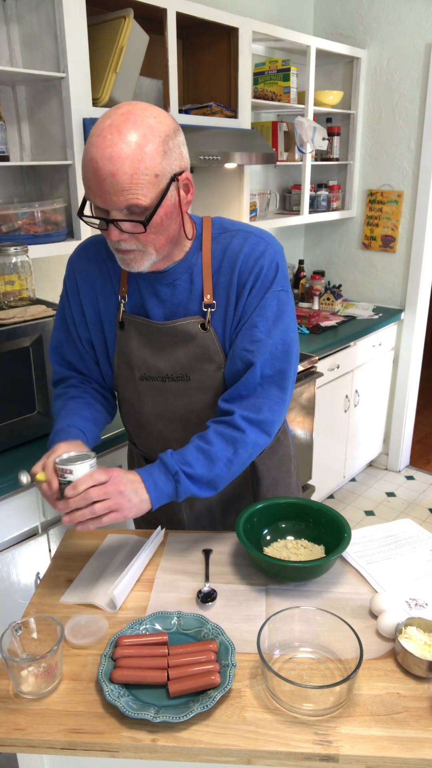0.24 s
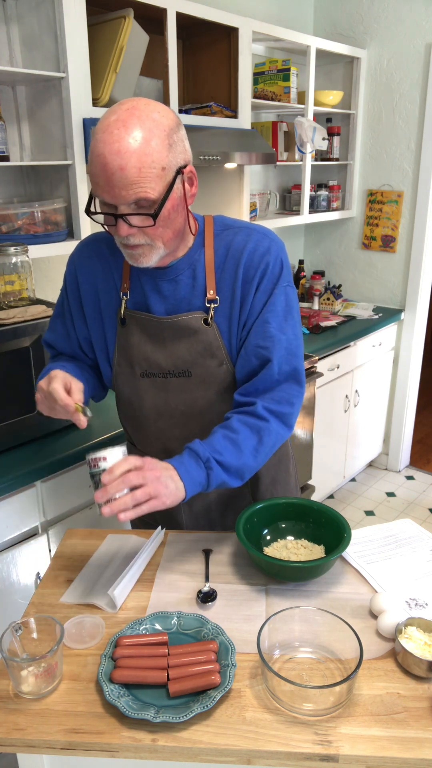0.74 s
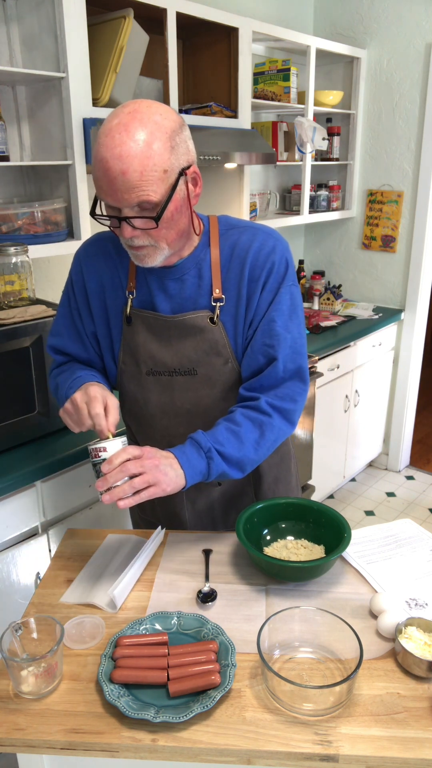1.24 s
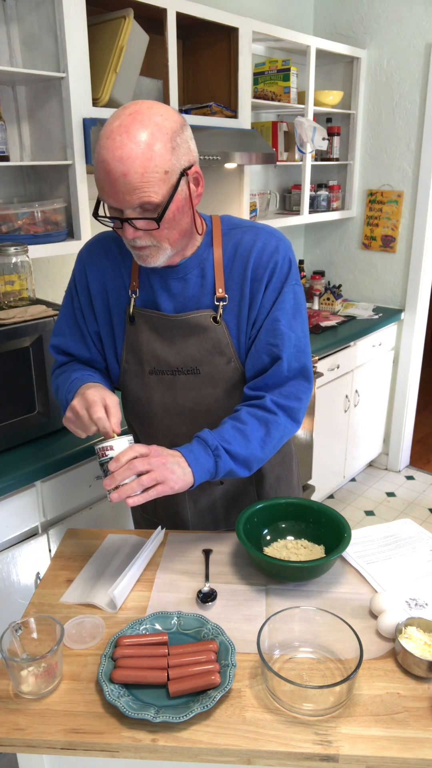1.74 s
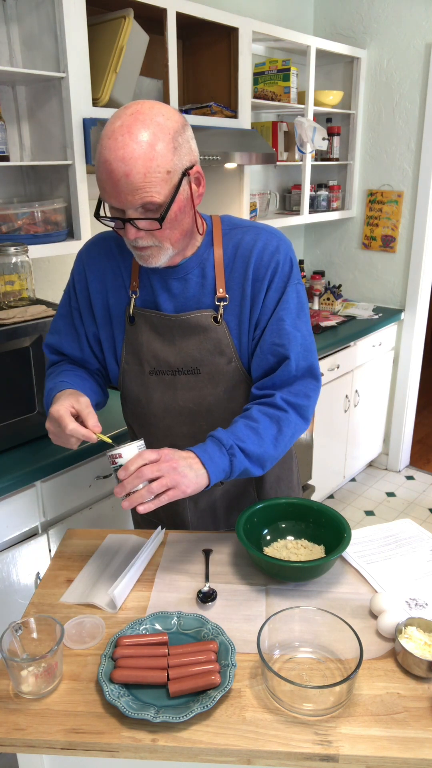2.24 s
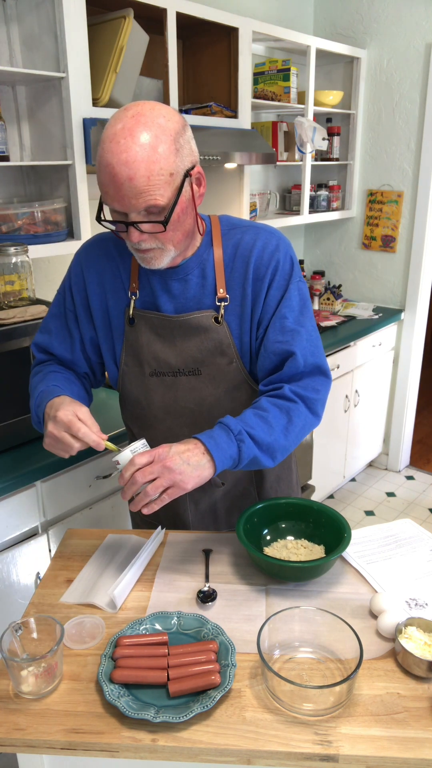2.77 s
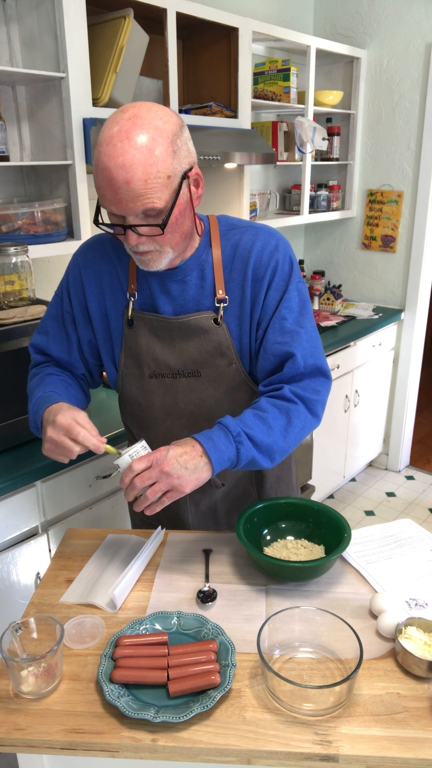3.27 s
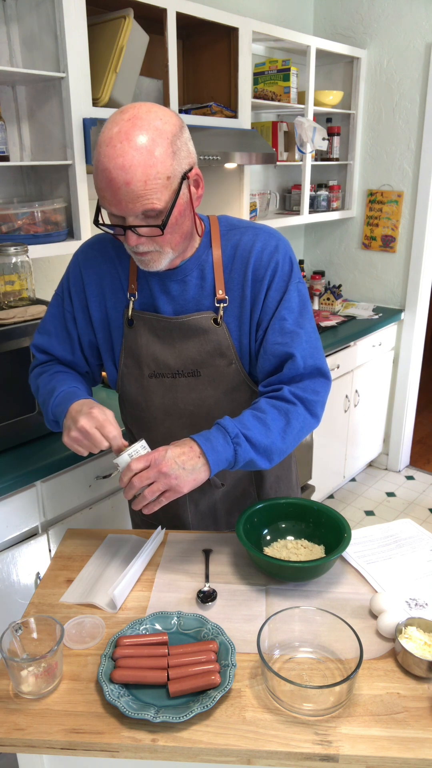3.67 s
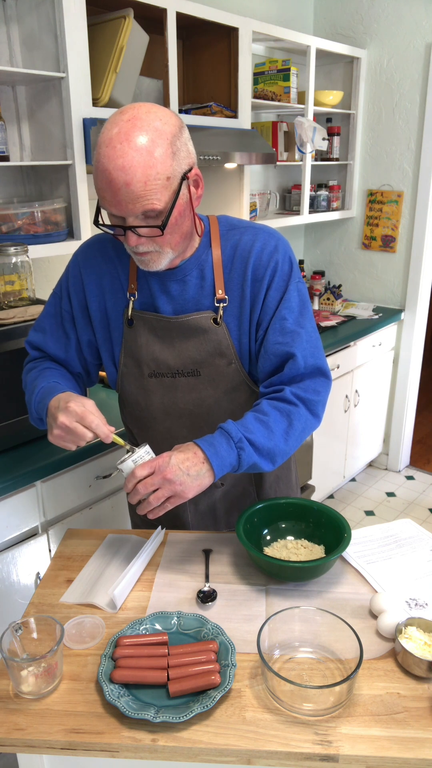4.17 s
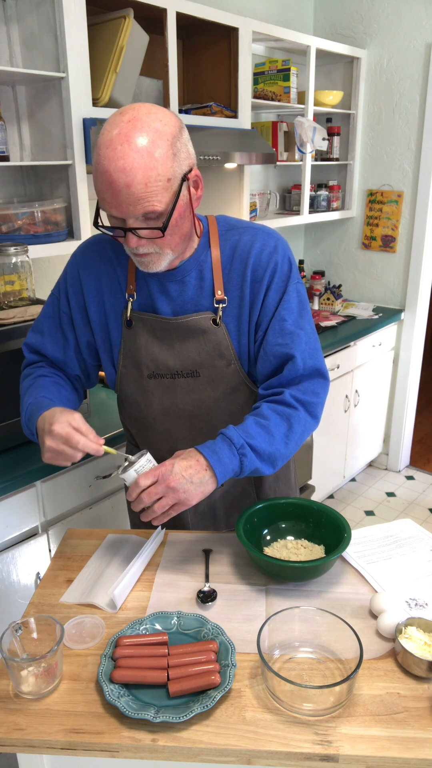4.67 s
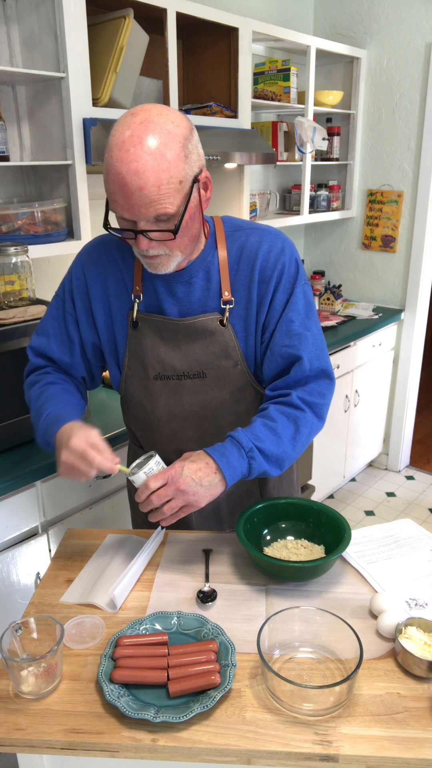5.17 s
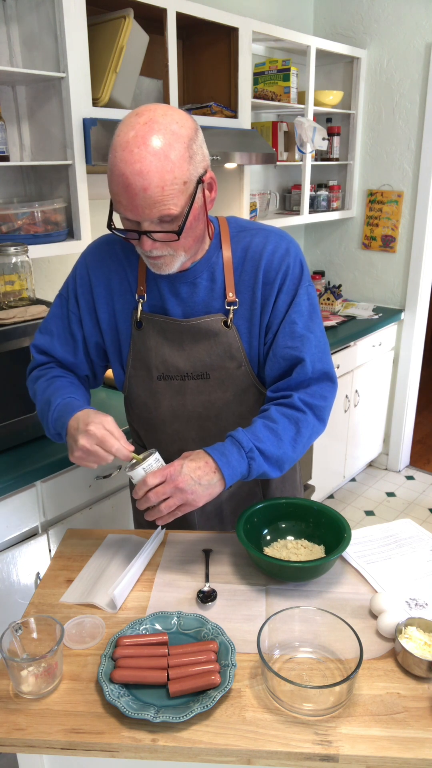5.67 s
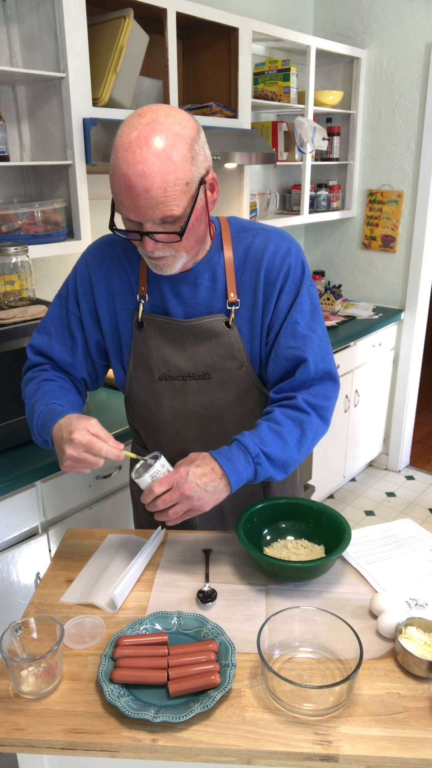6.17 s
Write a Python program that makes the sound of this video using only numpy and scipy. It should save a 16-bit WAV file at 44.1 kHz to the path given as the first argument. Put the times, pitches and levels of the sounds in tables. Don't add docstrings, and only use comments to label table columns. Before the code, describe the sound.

Loose metal measuring spoons rattle in the hand, then one clicks sharply into a metal can, digs through powder, scrapes and taps the rim.

```python
import sys
import numpy as np
from scipy import signal
from scipy.fft import rfft, irfft
from scipy.io import wavfile

SR = 44100
rng = np.random.default_rng(int(sys.argv[2]) if len(sys.argv) > 2 else 0)


def decibels_to_gain(level_db):
    exponent = np.asarray(level_db, float) / 20
    return 10 ** exponent


def persist_wave(psi):
    counts = np.round(np.clip(psi, -1, 1) * 32767).astype(np.int16)
    wavfile.write(sys.argv[1], SR, np.atleast_2d(counts).T)


N = 283122

# frequency in Hz, width in Hz, level in dB.
SPOON_LOW = [(583, 120, -4.5), (1060, 150, 4), (1243, 71, 6.5), (1560, 130, -2)]
SPOON_BOWL = [(2160, 200, -14.5), (2625, 78, -3.5), (2840, 120, -1.5), (2760, 260, -6), (3150, 180, -1.5),
              (4300, 320, 1), (4560, 260, -18)]


def rms_one(x):
    return x / np.sqrt(np.mean(x ** 2) + 1e-20)


def at_hz(points, hz):
    table_hz, value = np.transpose(points)
    return np.interp(np.log(hz), np.log(table_hz), value)


def high(x, hz):
    return signal.sosfilt(signal.butter(4, hz, "high", fs=SR, output="sos"), x)


def dull(x, hz):
    return signal.sosfilt(signal.butter(2, hz, fs=SR, output="sos"), x)


def colour(x, spectrum):
    hz = np.maximum(np.fft.rfftfreq(N, 1 / SR), 1)
    return rms_one(irfft(rfft(x) * decibels_to_gain(at_hz(spectrum, hz)), N))


def resonate(x, modes):
    out = 0
    for k, (hz, width_hz, db) in enumerate(modes):
        r = np.exp(-np.pi * max(width_hz, 5) / SR)
        w = 2 * np.pi * hz / SR
        ring = signal.lfilter([0, np.sin(w)], [1, -2 * r * np.cos(w), r * r], x + 1e-18)
        out = out + (-1) ** k * decibels_to_gain(db) * ring
    return out


def strikes(times, levels_db):
    out = np.zeros(N)
    out[np.round(np.asarray(times) * SR).astype(int)] = decibels_to_gain(levels_db)
    return out


def bursts(times, levels_db, t60):
    fall = signal.lfilter([1], [1, -decibels_to_gain(-60 / (t60 * SR))], strikes(times, levels_db) + 1e-18)
    return fall * rng.standard_normal(N)


def grains(per_s, spread_db):
    sizes = decibels_to_gain(spread_db * np.minimum(rng.exponential(1, N), 4)) * rng.choice([-1, 1], N)
    return sizes * (rng.random(N) < per_s / SR)


def swells(rows):
    t, out = np.arange(0, N + 32, 32) / SR, 0
    for peak_s, rise_s, fall_s, *levels_db in rows:
        away = np.where(t < peak_s, (peak_s - t) / rise_s, (t - peak_s) / fall_s)
        out = out + decibels_to_gain(np.array(levels_db)[:, None] - 19 * away ** 1.24)
    return [np.interp(np.arange(N) / SR, t, gain) for gain in out]


def rubbed(x, modes, wander_db):
    peaks = [(hz, width_hz + 0.0064 * hz, db + 20 * np.log10(width_hz + 0.012 * hz))
             for hz, width_hz, db in modes]
    click = resonate(np.arange(4096) == 0, peaks)
    knots = np.arange(0, len(x) + 1500, 1500)
    rung = 0
    for k, peak in enumerate(peaks):
        drift = np.interp(np.arange(len(x)), knots, rng.standard_normal(len(knots)))
        rung = rung + (-1) ** k * resonate(x * decibels_to_gain(wander_db * drift), [peak])
    return rung / np.sqrt(np.sum(click ** 2))


def moving(s, pitch_hz, width_hz):
    turns = np.cumsum(np.interp(np.arange(N) / SR, s, pitch_hz)) / SR
    r = np.exp(-np.pi * width_hz / SR)
    noise = rng.standard_normal(N) + 1j * rng.standard_normal(N)
    pull = signal.lfilter([1], [1, -2 * r, r * r], noise)
    pull = pull / np.abs(pull) ** 0.31
    return rms_one((pull * np.exp(2j * np.pi * turns)).real)


def room_hum():
    # frequency in Hz, density in dB per Hz.
    hum = [(15, -58), (25, -45), (43, -6), (76, 0), (212, -3.5), (249, -1), (373, -5), (489, -12),
           (591, -9), (775, -14), (1100, -11.5), (1230, -16), (1330, -15), (6920, -14), (16000, -31)]
    return decibels_to_gain(-57.5) * colour(rng.standard_normal(N), hum)


def finger_rustle():
    # peak in seconds, rise in seconds, fall in seconds, level in dB.
    fingers = [
        (3.65, 0.15, 0.11, -60),
        (0.002, 0.013, 0.094, -59),
        (0.2, 0.29, 0.25, -64),
        (0.35, 0.022, 0.16, -60.5),
        (0.457, 0.017, 0.21, -54),
        (0.664, 0.012, 0.032, -55),
        (0.78, 0.23, 0.053, -59),
    ]
    # frequency in Hz, density in dB per Hz.
    rustle = [(240, -33), (500, 2.5), (1200, -3), (2500, -2.5), (4500, -2.5), (6000, -7), (9000, -11),
              (11600, -25), (16000, -24)]
    grip, = swells(fingers)
    return decibels_to_gain(5.0) * grip * colour(grains(7000, spread_db=3.0), rustle)


def spoon_slides():
    # peak in seconds, rise in seconds, fall in seconds, low clank in dB, bowl ring in dB.
    slides = [(0.34, 0.0045, 0.094, -50, -59), (0.395, 0.063, 0.065, -51, -53.5),
              (0.5, 0.1, 0.23, -54, -59), (0.6, 0.04, 0.046, -58, -51.5), (0.68, 0.056, 0.086, -58, -54),
              (0.71, .005, .08, -51, -57), (0.78, 0.058, 0.058, -51, -51), (0.815, 0.058, .025, -53, -55)]
    # peak in seconds, rise in seconds, fall in seconds, level in dB.
    heft = [
        (0.002, 0.012, 0.058, -46),
        (0.108, 0.024, 0.062, -46.5),
        (0.27, 0.093, 0.015, -48),
    ]
    # frequency in Hz, width in Hz, level in dB.
    palm = [(1060, 150, 4.5), (1230, 94, 5.5), (1670, 150, -3), (2050, 240, -0.5), (2900, 1100, -7)]
    rub = rms_one(grains(2500, spread_db=3.0))
    low, bowl = swells(slides)
    press, = swells(heft)
    out = rubbed((low * rub)[:SR], SPOON_LOW, wander_db=1.0)
    out += decibels_to_gain(3.5) * rubbed((bowl * rub)[:SR], SPOON_BOWL[:3], wander_db=0.0)
    out += rubbed((press * rub)[:SR], palm, wander_db=-3.0)
    return decibels_to_gain(-1.5) * np.pad(out, (0, N - SR))


def spoon_knocks():
    # time in seconds, peak in dB, low clank and bright tick in dB re peak.
    rattle = [(0.097, -47, -1.5, -21), (0.111, -37, -12, -20), (0.14, -47, 2.5, -9),
              (0.266, -40, -3.5, -11), (0.336, -43, -2, -26), (0.342, -48, -10, -20),
              (0.388, -28, -14, -34), (0.409, -47, -3, -21), (0.4491, -37.5, -13, -7),
              (0.4928, -30, -12.5, -20), (0.5844, -30, -9, -29), (0.6617, -31, -21, -27),
              (0.666, -38, -23, -8.5), (0.7058, -38.5, -1, -18), (0.73, -39.5, -4, -9),
              (0.761, -29, -14, -20), (0.775, -37, -1, -17), (0.7927, -30, -22, -18),
              (0.807, -41, -7.5, -22), (0.82, -50, -13, -13)]
    s, peak_db, low_db, tick_db = np.transpose(rattle)
    luck_db = 2.7 * rng.standard_normal((len(s), 14))
    out = dull(high(bursts(s, peak_db + tick_db + 19.0, t60=0.01), 3400), 4900)
    for k, mode in enumerate(SPOON_BOWL):
        blow_db = peak_db + luck_db[:, k]
        blow = strikes(s, blow_db - 7.0) + bursts(s, blow_db - 24.0, t60=0.02)
        out += resonate(dull(high(blow, 1300), 5000), [mode])
    for k, mode in enumerate(SPOON_LOW):
        blow_db = peak_db + low_db - 24.5 + luck_db[:, -1 - k]
        out += resonate(bursts(s, blow_db, t60=0.041), [mode])
    return out


def can_blows():
    # time in seconds, peak in dB, contact pitch in Hz, can ring and thud in dB re peak.
    knocks = [
        (1.0652, -27.5, 3800, -22, -7),
        (3.407, -24, 3350, -28, -14),
        (5.3487, -33, 5030, -31, -7.5),
        (5.4756, -40, 3740, -17, -4),
        (5.5812, -25, 3900, -6.5, -15),
    ]
    # time in seconds, peak in dB, contact pitch in Hz, can ring and crack in dB re peak.
    clicks = [
        (1.5785, -2, 3220, -71, -15),
        (3.8831, -22, 3910, -13, -44),
        (5.078, -37, 4140, -50, -27),
        (5.1821, -9.5, 5310, -22, -25),
        (5.7375, -19, 5300, -22, -32.5),
    ]
    # frequency in Hz, width in Hz, level in dB.
    cavity = [(767, 28, -6), (906, 130, 5.5), (870, 44, -6)]
    click_thud_db, knock_crack_db = -40.5, -21
    rows = [(*row, click_thud_db) for row in clicks]
    rows += [(*row[:-1], knock_crack_db, row[-1]) for row in knocks]
    s, peak_db, contact_hz, ring_db, crack_db, thud_db = np.transpose(rows)
    out = 0
    for t, db, hz, top_db in zip(s, peak_db, contact_hz, crack_db):
        touch = resonate(strikes([t, t + 2 / hz], [db - 16.0, db - 18.0]), [(hz, 3000, 0.0)])
        touch = touch + bursts([t], db - 24.5, t60=0.015)
        body_db = -5.0 - 9.1 * np.log2(hz / 3000)
        out = out + resonate(touch, [(hz, 550, 0.0), (0.64 * hz, 700, -6.0), (1320, 300, body_db),
                                     (1.7 * hz, 900, -11.0), (2.0 * hz, 1500, -9.0)])
        edge_hz = min(hz ** 2 / 1500, 19000)
        crack = high(bursts([t], db + top_db + 12.5, t60=0.02), 2570)
        out = out + dull(dull(crack, edge_hz), edge_hz)
    out = dull(high(out, 640), 10700)
    out += high(resonate(strikes(s, peak_db + thud_db), [(286, 55, -0.89), (626, 150, -1.5)]), 283)
    return out + resonate(bursts(s, peak_db + ring_db - 19.5, t60=0.037), cavity)


def contacts():
    # frequency in Hz, width in Hz, level in dB.
    sifts = [(0.2, 0.095, 0.11, -50, -80), (5.362, 0.012, 0.1, -52.5, -78),
             (1.07, 0.004, 0.045, -52.5, -44), (1.155, 0.051, 0.024, -51.5, -75),
             (1.185, .004, .03, -49.5, -75), (1.197, 0.023, 0.066, -44, -75),
             (1.396, 0.039, 0.19, -56, -67), (3.417, 0.0083, 0.025, -66, -41.5),
             (3.457, 0.045, 0.026, -45, -67), (3.58, 0.16, 0.17, -56.5, -54),
             (3.685, 0.057, 0.11, -44.5, -56), (5.57, 0.094, 0.028, -43, -75)]
    sift_modes = [(3490, 490, -4.5), (4400, 260, -8.5), (6000, 410, -8), (6370, 520, -7)]
    skids = [
        (1.586, 0.004, 0.029, -27, -53),
        (1.603, 0.011, 0.038, -34, -53),
    ]
    skid_modes = [(1350, 320, -19), (3060, 180, -1), (3460, 180, 1), (3620, 100, 11), (4050, 220, -5),
                  (4520, 230, -3), (5300, 150, -11), (6500, 180, -1), (8150, 500, -10)]
    rebounds = [
        (1.635, 0.012, 0.053, -38.5, -44),
        (1.655, .02, 0.037, -44.5, -50),
    ]
    rebound_modes = [(2690, 25, 17), (3080, 280, -5), (3920, 200, -13), (5200, 80, -5), (4300, 200, -13),
                     (6400, 150, -9)]
    digs = [
        (1.714, 0.031, 0.032, -37.5, -21),
        (1.737, 0.029, 0.04, -29, -26),
        (1.765, 0.036, 0.031, -26, -25),
        (1.79, 0.018, 0.032, -38, -36.5),
        (1.81, .02, 0.034, -49, -47),
        (1.85, 0.037, 0.15, -54, -51),
    ]
    dig_modes = [(1720, 68, -2.5), (2025, 24, 3), (2206, 40, -6), (2600, 53, -12), (2940, 38, -0.5),
                 (3140, 53, -2), (3450, 65, -2.5), (3720, 150, -1), (4360, 50, -5), (4560, 36, -7),
                 (5180, 40, -14), (5900, 66, -11), (6150, 50, -7), (6440, 80, -11)]
    rims = [
        (3.775, 0.0073, 0.052, -38, -26),
        (3.8, 0.024, 0.042, -34, -29.5),
        (3.824, 0.015, 0.02, -45, -25.5),
        (3.845, 0.015, 0.045, -42, -41),
        (3.874, 0.017, 0.017, -45, -25.5),
    ]
    rim_modes = [(2086, 24, 1), (2755, 29, 6), (3510, 140, 2), (4040, 90, 0.5), (5030, 79, -1),
                 (5800, 53, 2.5), (5460, 28, -18), (6400, 37, -16), (8100, 40, -30), (9400, 48, -27),
                 (14000, 100, -33)]
    drags = [
        (3.885, 0.0065, 0.063, -33.5, -39),
        (3.913, 0.0055, 0.033, -39, -52),
        (5.64, 0.023, 0.15, -47.5, -41.5),
        (5.68, 0.057, 0.066, -41.5, -46),
        (5.72, 0.031, 0.034, -38.5, -37),
    ]
    drag_modes = [(2810, 130, 2.5), (3180, 22, 2), (3400, 8.4, 0), (3910, 110, 4), (5200, 250, -3.5),
                  (4600, 52, -15), (5760, 130, -15), (6340, 300, -19), (11700, 240, -29)]
    levels = [
        (4.0, 0.073, 0.046, -48.5, -49.5),
        (4.022, 0.04, 0.092, -44.5, -50),
        (4.072, 0.085, 0.055, -43, -48.5),
        (4.185, 0.15, 0.089, -49, -52.5),
    ]
    level_modes = [(3630, 170, -5.5), (3870, 39, -7), (4040, 31, 1), (4400, 58, -8), (4550, 50, -7),
                   (5000, 130, -0.5), (5250, 110, -2), (5700, 90, -12), (5820, 50, -9), (6400, 200, -9),
                   (7200, 100, -13), (7700, 87, -18), (9430, 65, -17), (11800, 100, -25)]
    smooths = [
        (4.23, 0.095, 0.13, -52, -66),
        (4.3, 0.12, 0.2, -59, -54.5),
        (5.91, 0.029, 0.25, -53.5, -62),
        (6.105, 0.093, 0.029, -51.5, -55),
        (6.225, 0.14, .11, -49.5, -45.5),
    ]
    smooth_modes = [(2850, 500, -8), (3520, 250, 1), (4160, 480, -2), (5300, 110, 2), (6400, 400, -5),
                    (9430, 100, -14), (11600, 100, -13)]
    nudges = [
        (4.66, 0.141, 0.089, -56.5, -56),
        (4.826, 0.061, 0.048, -55, -55.5),
        (4.955, 0.048, 0.035, -44.5, -62),
        (4.966, 0.014, 0.03, -43.5, -36),
        (5.04, 0.097, 0.0224, -82, -47),
        (5.085, 0.0097, 0.046, -58.5, -70),
    ]
    nudge_modes = [(2236, 112, -5), (2800, 51, 0.5), (3670, 390, -1), (5750, 470, 2), (9370, 50, -12),
                   (11500, 60, -17)]
    taps = [
        (5.186, 0.0046, 0.0099, -31, -47),
        (5.2, 0.021, 0.082, -49.5, -41.5),
        (5.35, 0.0044, 0.043, -52.5, -40),
        (5.474, 0.0089, 0.059, -53.5, -37),
    ]
    tap_modes = [(3940, 320, 10), (4570, 140, -4), (5060, 87, 3), (5200, 90, -6), (5700, 180, 12),
                 (6100, 80, -2), (7500, 190, -14), (8450, 230, -16), (9400, 260, -19), (11380, 200, -18)]
    catches = [
        (5.584, 0.006, 0.037, -31.5, -24.5),
        (5.615, 0.019, 0.053, -41.5, -33.5),
    ]
    catch_modes = [(2750, 240, -0.5), (3480, 51, 5), (3950, 73, 6), (4100, 60, 0), (5300, 400, -11),
                   (6400, 380, -18)]
    shakes = [
        (5.739, 0.0018, 0.036, -33, -33),
        (5.762, 0.031, 0.034, -37.5, -53),
        (5.79, 0.037, 0.11, -40, -44),
    ]
    shake_modes = [(1413, 20.6, -20), (2800, 50, 3.5), (3150, 72, 2.5), (3390, 53, 5), (3560, 65, 9),
                   (3850, 39, -3), (4290, 120, -0.5), (5000, 150, -1), (5400, 180, -3), (5660, 200, -6),
                   (6320, 110, -1), (7080, 180, -12)]
    return [(sifts, sift_modes, -14, -1), (skids, skid_modes, -4, -12), (rebounds, rebound_modes, -6, -12),
            (digs, dig_modes, 0.5, -16), (rims, rim_modes, -8, -14), (drags, drag_modes, -6, -16),
            (levels, level_modes, -3, -13), (smooths, smooth_modes, -3, -13), (catches, catch_modes, -8, -16),
            (nudges, nudge_modes, -1.5, -21), (taps, tap_modes, 1.5, -11), (shakes, shake_modes, -4.5, -15)]


def scrape():
    # frequency in Hz, density in dB per Hz.
    crowd_spectrum = [(590, -31), (1000, -3.5), (1430, 1), (1570, -7), (2050, -6.5), (2470, -3.5),
                      (3010, -4.5), (6330, -5.5), (16000, -48)]
    # frequency in Hz, density in dB per Hz.
    powder_spectrum = [(3000, -27), (5500, 0.5), (7000, -3.5), (8500, -4.5), (10300, -11), (11500, -7.5),
                       (15200, -19), (16000, -27)]
    # time in seconds, cavity pitch in Hz.
    mouth = [
        (1.668, 860),
        (1.695, 797),
        (1.771, 850),
        (3.851, 848),
        (3.88, 870),
        (5.0, 868),
        (5.199, 850),
        (6.1, 868),
    ]
    rub = rms_one(grains(6000, spread_db=3.0))
    crowd = colour(grains(5000, spread_db=4.0), crowd_spectrum)
    sheet, cavity, powder = np.zeros((3, N))
    for rows, modes, crowd_db, powder_db in contacts():
        effort, air = swells(rows)
        live = np.flatnonzero(effort > 1e-5)
        for run in np.split(live, np.flatnonzero(np.diff(live) > 1) + 1):
            span = slice(run[0], run[-1] + 3000)
            sheet[span] += rubbed((effort * rub)[span], modes, wander_db=3.0)
        sheet += decibels_to_gain(crowd_db) * effort * crowd
        cavity += air
        powder += decibels_to_gain(powder_db) * effort
    hollow = high(cavity * moving(*np.transpose(mouth), width_hz=107), 745)
    hiss = powder * colour(grains(7400, spread_db=1.5), powder_spectrum)
    return decibels_to_gain(-6.5) * hollow + decibels_to_gain(-3.5) * high(sheet, 1110) + decibels_to_gain(-3.5) * hiss


def singing_handle():
    # peak in seconds, rise in seconds, fall in seconds, level in dB, pitch in Hz.
    overhang = np.array([(1.685, 0.006, 0.015, -35, 1082), (3.833, 0.034, 0.022, -40, 983),
                         (3.873, 0.022, 0.022, -32, 994), (3.884, 0.005, 0.11, -47, 1350),
                         (4.178, 0.23, 0.24, -59, 1086), (4.958, 0.05, 0.084, -54, 1071),
                         (5.192, .005, 0.12, -52, 1250), (5.649, 0.043, .1, -44.5, 984),
                         (5.68, 0.031, 0.036, -52, 1050), (5.72, 0.033, 0.033, -46, 1164),
                         (5.735, 0.018, 0.012, -54, 1228), (5.739, 0.0028, 0.02, -31, 1413),
                         (5.77, 0.02, 0.04, -61, 1413), (6.106, 0.023, 0.029, -55, 1047),
                         (6.24, 0.096, 0.093, -57.5, 1060)])
    level, = swells(overhang[:, :4])
    peak_s, pitch_hz = overhang[:, [0, 4]].T
    return decibels_to_gain(-3.0) * high(level * moving(peak_s, pitch_hz, width_hz=143), 630)


def kitchen(x):
    # frequency in Hz, t60 in seconds.
    decay = [(300, 0.47), (900, 0.33), (3000, 0.43), (8000, 0.35), (14000, 0.42)]
    t, tail = np.arange(SR // 2) / SR, 0
    for hz in 250 * 2.0 ** np.arange(6.5):
        edges_hz = [hz / np.sqrt(2), min(hz * np.sqrt(2), 20000)]
        band = signal.butter(2, edges_hz, "band", fs=SR, output="sos")
        noise = signal.sosfilt(band, rng.standard_normal(len(t)))
        tail = tail + noise * decibels_to_gain(-60 * t / at_hz(decay, hz))
    tail = tail * (t > 0.004)
    return signal.fftconvolve(x, tail / np.sqrt(np.sum(tail ** 2)))[:N]


def scene():
    near = finger_rustle() + spoon_slides() + spoon_knocks()
    near = near + can_blows() + scrape() + singing_handle()
    return (near + decibels_to_gain(-6.5) * kitchen(near) + room_hum())[None]


def top_cut(x):
    return signal.sosfilt(signal.butter(12, 15830, fs=SR, output="sos"), x)


def record(dry):
    return top_cut(dry)


dry = scene()
out = record(dry)
persist_wave(out)
```